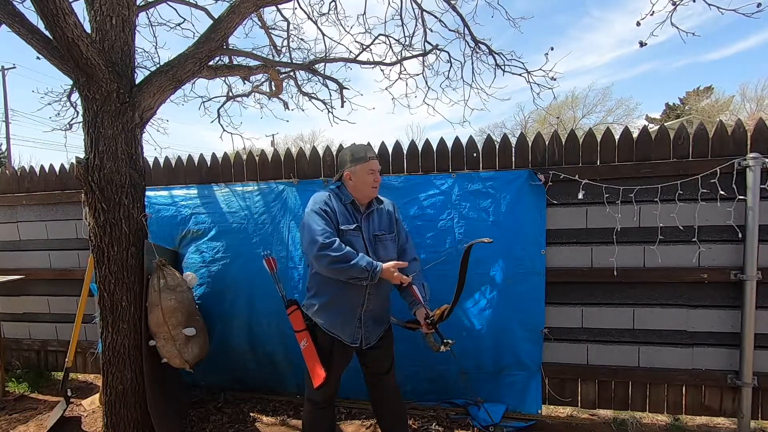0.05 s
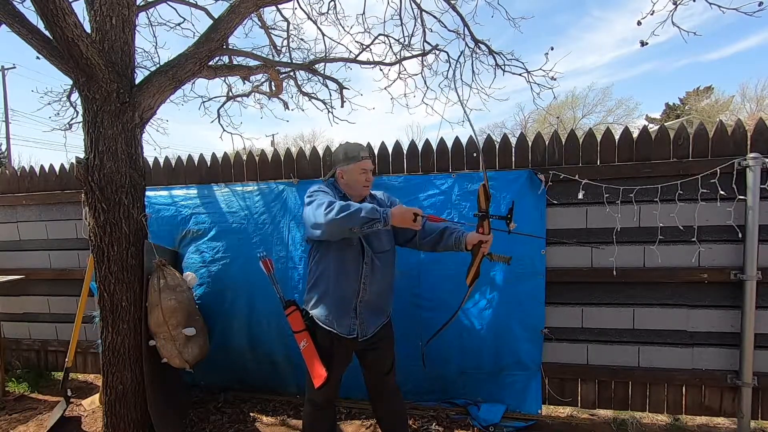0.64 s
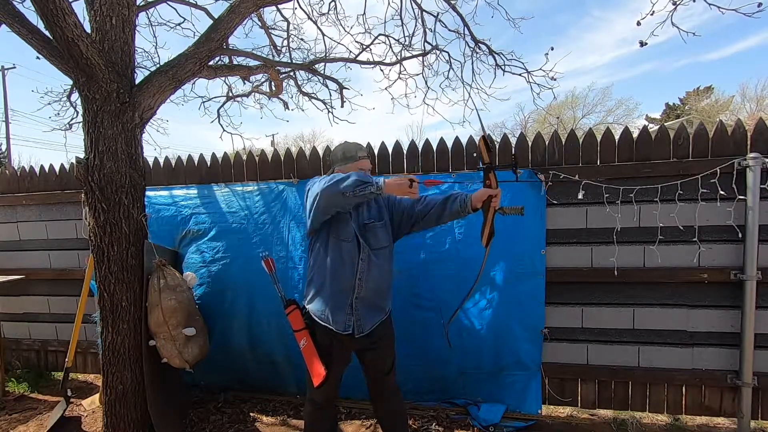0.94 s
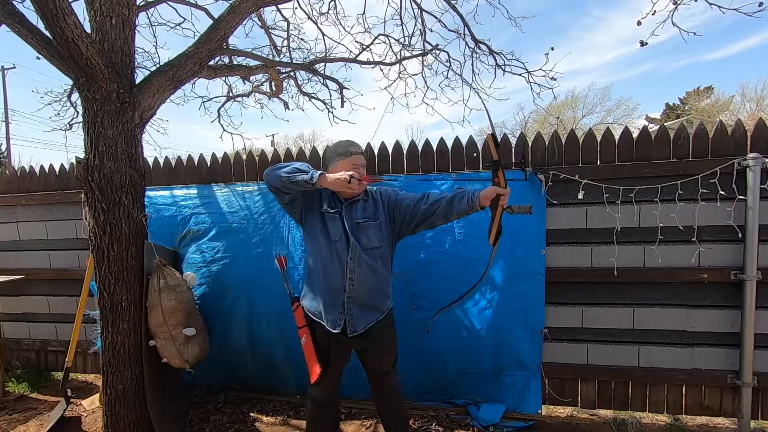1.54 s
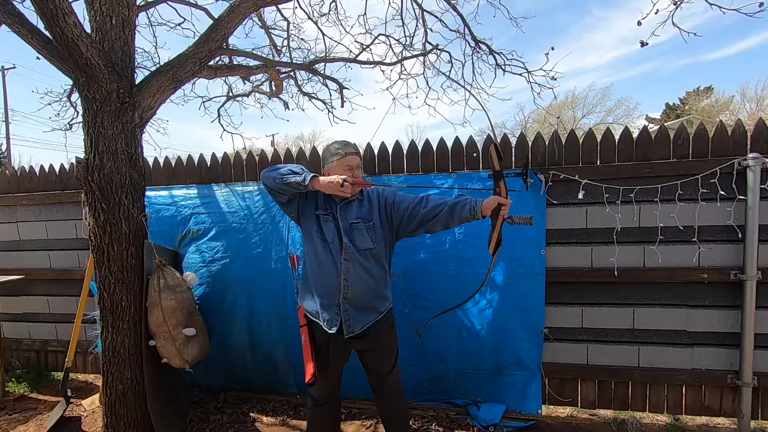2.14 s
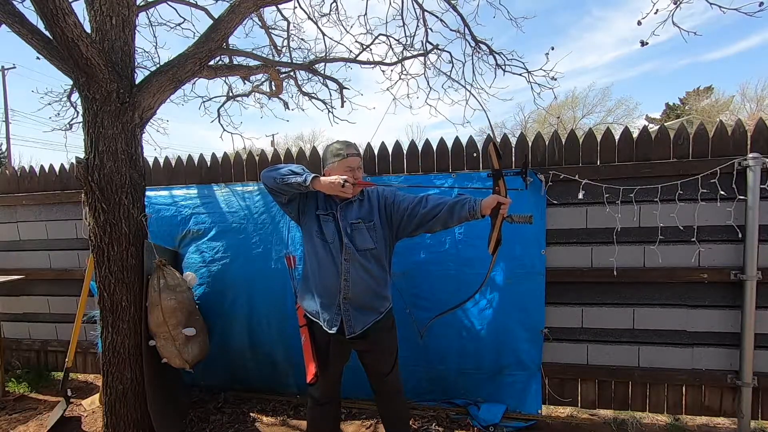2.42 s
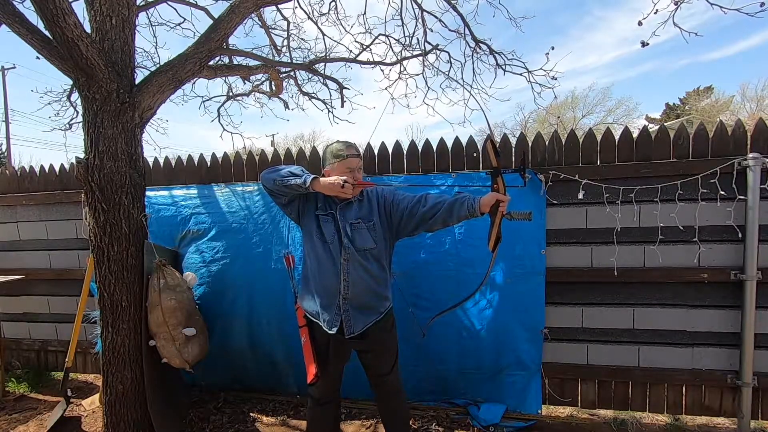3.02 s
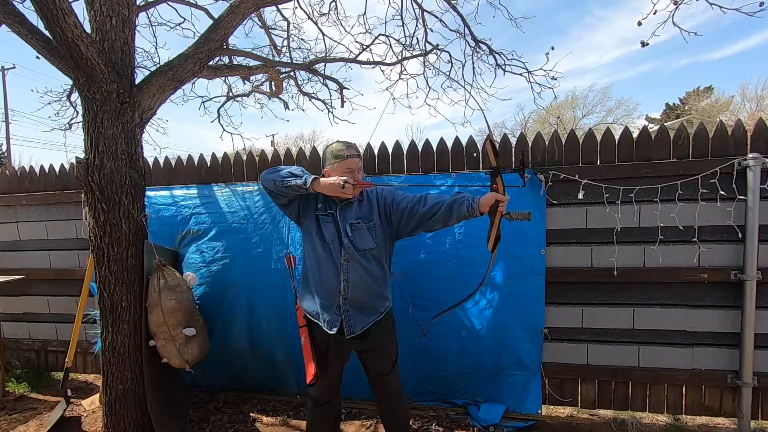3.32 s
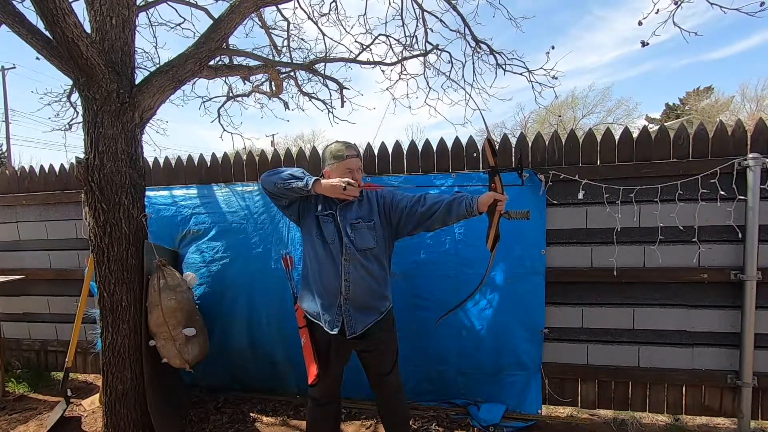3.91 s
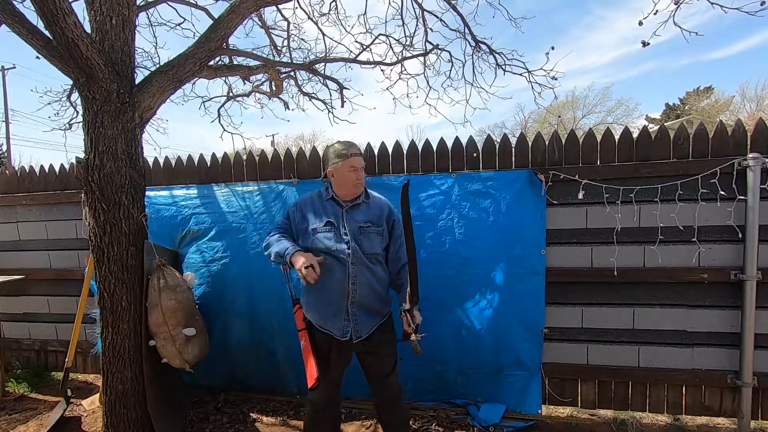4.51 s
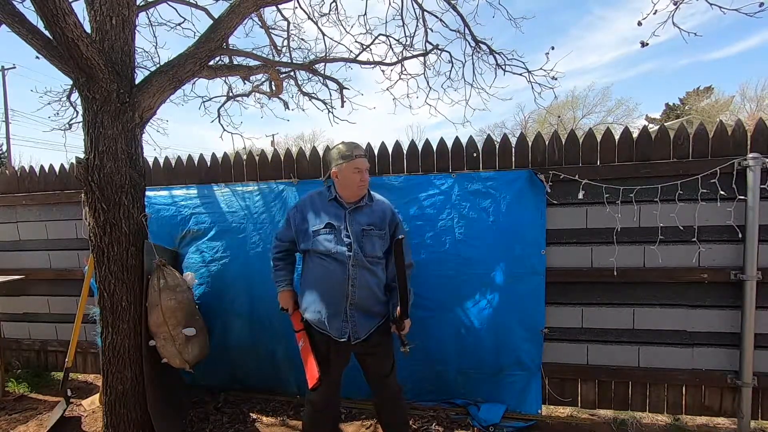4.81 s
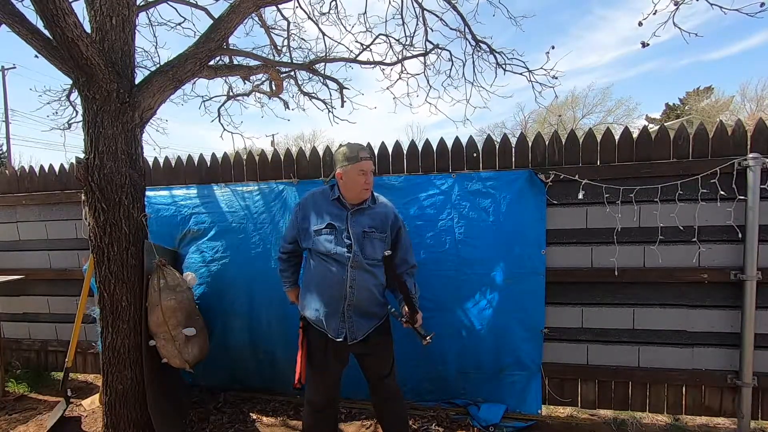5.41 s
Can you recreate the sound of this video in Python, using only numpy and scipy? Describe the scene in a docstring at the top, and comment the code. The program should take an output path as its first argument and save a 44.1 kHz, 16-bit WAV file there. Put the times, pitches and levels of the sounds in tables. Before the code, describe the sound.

A bow snaps and an arrow thuds into a nearby target in a windy backyard, with two faint bird chirps beforehand.

```python
"""A recurve bow fires one arrow in a fenced backyard on a windy day.
The nock clicks off, the string slaps the limbs and hums out, and the arrow thuds into a nearby target.
Gusts buffet the microphone over a bed of far traffic, and a bird chirps twice before the shot.
The gear ticks now and then; as the bow is lowered, a jacket rustles and the string is brushed."""
import sys
import numpy as np
from scipy import signal
from scipy.fft import rfft, irfft
from scipy.io import wavfile
from scipy.ndimage import uniform_filter1d

SR = 44100
rng = np.random.default_rng(int(sys.argv[2]) if len(sys.argv) > 2 else 0)


def inscribe(sig):
    """Save sig as 16-bit PCM at rate SR to the path in sys.argv[1].

    A 1-D sig is mono; a 2-D sig holds one channel per row.
    Samples are clipped to [-1, 1] before scaling.
    """
    pcm = np.round(np.clip(np.atleast_2d(sig).T, -1, 1) * 32767)
    wavfile.write(sys.argv[1], SR, pcm.astype(np.int16))


N = 244755
T = np.arange(N) / SR


def from_db(db):
    """Decibels as a gain."""
    return 10 ** (np.asarray(db) / 20)


def rms_one(x):
    """The same sound at rms 1."""
    return x / np.sqrt(np.mean(x ** 2) + 1e-20)


def low_pass(x, hz, order=2):
    """Butterworth cut of the treble."""
    return signal.sosfilt(signal.butter(order, min(hz, .45 * SR), fs=SR, output="sos"), x)


def high_pass(x, hz, order=2):
    """Butterworth cut of the bass."""
    return signal.sosfilt(signal.butter(order, hz, "high", fs=SR, output="sos"), x)


def noise(colour):
    """Steady noise shaped by an EQ curve of (Hz, dB) points, rms 1."""
    hz, db = np.transpose(colour)
    bins_hz = np.arange(1, N // 2 + 2) * SR / N
    eq = from_db(np.interp(np.log(bins_hz), np.log(hz), db))
    return rms_one(irfft(rfft(rng.standard_normal(N)) * eq, N))


def band_noise(hz, width_hz):
    """Noise through one broad or narrow resonance, rms 1."""
    middle = np.sqrt(hz ** 2 + width_hz ** 2 / 4)
    edges = np.clip([middle - width_hz / 2, middle + width_hz / 2], 10, .45 * SR)
    band = signal.butter(2, edges, "band", fs=SR, output="sos")
    return rms_one(signal.sosfilt(band, rng.standard_normal(N)))


def evened(x, seconds):
    """The sound levelled by its own running rms."""
    return x / np.sqrt(uniform_filter1d(x ** 2, int(seconds * SR)) + 1e-6)


def swells(rows):
    """Envelope of rounded swells (peak s, dB, half length s) that add in power."""
    gains = (from_db(db) / np.cosh(np.clip((T - s) / half, -30, 30)) for s, db, half in rows)
    return np.sqrt(sum(gain ** 2 for gain in gains))


def clicks(events):
    """One impulse for each (s, dB)."""
    out = np.full(N, 1e-18)
    for s, db in events:
        out[round(s * SR)] += from_db(db)
    return out


def ring(force, modes):
    """Struck modes (Hz, dB, t60 s) as decaying sines."""
    out = np.zeros(N)
    for hz, db, t60 in modes:
        decay, angle = from_db(-60 / (t60 * SR)), 2 * np.pi * hz / SR
        feedback = [1, -2 * decay * np.cos(angle), decay * decay]
        out += from_db(db) * signal.lfilter([0, np.sin(angle)], feedback, force)
    return out


def fade(force, t60):
    """Envelope that jumps at each blow and dies away."""
    return signal.lfilter([1], [1, -from_db(-60 / (t60 * SR))], force)


def yard(x, near_db, far_db, near_t60=0.052, far_t60=.5, near_hz=11000, far_hz=4200, delay_s=0.0025):
    """Sound with its quick scatter off fence and ground and a duller tail from trees and houses."""
    t = T[:SR]
    scatter, tail = rng.standard_normal((2, SR))
    near = low_pass(scatter, near_hz) * from_db(-60 * t / near_t60) * (t > delay_s)
    far = low_pass(tail, far_hz, order=4) * from_db(-60 * t / far_t60) * (1 - np.exp(-t / 0.018))
    echo = from_db(near_db) * near / np.linalg.norm(near) + from_db(far_db) * far / np.linalg.norm(far)
    return x + signal.fftconvolve(x, echo)[:N]


# Gusts on the microphone, and the low puff of the arrow's thud at 4.34 s.
# Each row: peak in seconds, rumble in dB, flutter in dB, half length in seconds.
GUSTS_AND_PUFF = [(0.095, -24, -32.5, 0.12), (0.286, -23, -41.5, 0.1), (2.077, -24, -49, 0.064),
                  (2.4, -13.5, -32.5, 0.052), (2.603, -10, -27.5, 0.055), (2.882, -16, -41, 0.071),
                  (3.0, -21, -40, 0.037), (3.18, -21, -46, 0.12), (4.344, -34, -30, 0.037),
                  (4.587, -19.5, -42.5, 0.12), (4.762, -14, -35.5, 0.082), (4.926, -24.5, -21, 0.017),
                  (5.016, -15, -36.5, 0.082), (5.454, -24.5, -37, 0.074)]
# EQ of the wind's sub rumble and its bass flutter. Each row: frequency in Hz, relative level in dB.
RUMBLE_COLOUR = [(5, -5.5), (10, 3.5), (20, 0.5), (32, -5), (45, -21), (70, -30), (120, -48), (300, -72)]
FLUTTER_COLOUR = [(30, -23), (55, 7), (85, 3), (130, -25), (220, -25.5), (600, -59)]
# The fastest gust's roar, then single eddies.
# Each row: centre in seconds, level in dB, half length in seconds.
ROAR = [(2.585, -28.5, 0.027)]
BUFFETS = [(0.108, -21.5, 0.0029), (2.575, -8.5, 0.0081), (2.624, -5.5, 0.015), (4.932, 0.5, 0.0099)]

def wind(lull_rumble_db=-39, lull_flutter_db=-47):
    """Eddies rumble, flutter and buffet on the microphone; one swell is the arrow's low puff."""
    peak_s, rumble_db, flutter_db, half_s = np.transpose(GUSTS_AND_PUFF)
    rumble_gain = np.hypot(from_db(lull_rumble_db), swells(zip(peak_s, rumble_db, half_s)))
    flutter_gain = np.hypot(from_db(lull_flutter_db), swells(zip(peak_s, flutter_db, half_s)))
    rumble = rumble_gain * evened(noise(RUMBLE_COLOUR), seconds=0.067)
    flutter = flutter_gain * evened(noise(FLUTTER_COLOUR), seconds=0.082)
    roar = swells(ROAR) * band_noise(hz=109, width_hz=54)
    buffets = np.zeros(N)
    for s, db, half in BUFFETS:
        offset = (T - s) / half
        # a passing eddy is a brief dip in pressure between two rises
        buffets += from_db(db) * (offset ** 2 - 1) * np.exp(-.5 * offset ** 2)
    return low_pass(rumble + flutter + roar + buffets, hz=450)


# EQ of far traffic and of still air. Each row: frequency in Hz, relative level in dB.
TRAFFIC_COLOUR = [(60, -12.5), (115, -5), (150, -17.5), (200, -10), (280, -13.5), (440, -14), (600, -16.5),
                  (800, -16), (1150, -21), (1700, -28.5), (2600, -37.5), (5000, -45.5), (16000, -84)]
AIR_COLOUR = [(1500, -2.5), (2700, -1), (5000, -1), (8000, -4), (15500, -4.5)]
# Swells of traffic, then a breeze through twigs and fence.
# Each row: peak in seconds, level in dB, half length in seconds.
TRAFFIC_SWELLS = [(0.1, -53, 0.36), (2.2, -50, 0.38), (4.6, -51, 0.69), (5.5, -48.5, 0.14)]
BREEZE = [(2.2, -59.5, 0.27)]
# Far machinery. Each row: centre in Hz, width in Hz, level in dB.
DRONE_BANDS = [(116, 36.6, -45.5), (177.2, 7.1, -53), (446.2, 17, -63.5)]

def town():
    """The ambience bed: far traffic, a wavering machine drone, a faint hiss and a passing breeze."""
    traffic = np.hypot(from_db(-49), swells(TRAFFIC_SWELLS)) * noise(TRAFFIC_COLOUR)
    drone = sum(from_db(db) * band_noise(hz, width) for hz, width, db in DRONE_BANDS)
    hiss = from_db(-64) * noise(AIR_COLOUR)
    breeze = swells(BREEZE) * band_noise(hz=1180, width_hz=820)
    return traffic + drone + hiss + breeze


# Small knocks. Each row: start in seconds, level in dB, centre in Hz, t60 in seconds.
GEAR_TICKS = [(1.111, -59, 4600, 0.045), (1.166, -54.5, 2590, 0.034), (1.211, -51.5, 1990, 0.035),
              (3.479, -42, 556, 0.043), (4.074, -37, 3980, 0.013), (4.491, -43.5, 2660, 0.016),
              (4.581, -59, 5270, .04), (4.746, -50.5, 8500, 0.015), (4.909, -50, 2560, 0.058),
              (5.271, -46, 1720, 0.11), (5.315, -55, 2470, 0.1), (5.427, -44.5, 2760, 0.086),
              (5.479, -51.5, 2800, 0.038)]
# Jacket moves. Each row: peak in seconds, level in dB, half length in seconds.
RUSTLES = [(4.71, -52.5, 0.036), (4.83, -55.5, 0.026), (4.92, -55.5, 0.046), (5.3, -63.5, 0.18)]
# EQ of the cloth. Each row: frequency in Hz, relative level in dB.
CLOTH_COLOUR = [(500, 9), (1500, -1), (5000, -8.5), (9000, -15), (15000, -24)]
# A brush against the string as the bow is lowered. Each row: start in seconds, strength in dB.
STRING_TOUCH = [(5.412, 0.5)]
# The brushed string's ring. Each row: pitch in Hz, relative level in dB, t60 in seconds.
STRING_MODES = [(390, -51, 0.36), (552, -45, 0.97), (974, -53, 0.91), (1370, -60, .6), (4730, -66, 0.36)]

def gear():
    """Handling foley: light knocks of bow and quiver, rustling cloth and a brushed string."""
    knocks = sum(fade(clicks([(s, db)]), t60) * band_noise(hz, 0.99 * hz)
                 for s, db, hz, t60 in GEAR_TICKS)
    creases = from_db(2.4 * rms_one(low_pass(rng.standard_normal(N), hz=59.9)))
    cloth = swells(RUSTLES) * rms_one(creases * noise(CLOTH_COLOUR))
    string = ring(clicks(STRING_TOUCH), STRING_MODES)
    return yard(knocks + cloth, near_db=-7, far_db=-25) + string


# Bird calls. Each row: time the pitch tops out in seconds, level in dB, top pitch in Hz.
CHIRPS = [(1.258, -50.5, 4450), (2.419, -43.5, 4380)]

def bird(rise_hz_per_s=24000, hold_s=0.00404, fall_hz_per_s=72000, range_hz=1700,
         half_s=.017, trill_hz=69, trill_depth=0.61):
    """A rough, trilling whistle climbs, holds and drops, with a weaker lower voice beside it."""
    out = np.zeros(N)
    for s, db, top_hz in CHIRPS:
        t = T - s
        below_top_hz = np.maximum(-rise_hz_per_s * t, fall_hz_per_s * (t - hold_s))
        pitch_hz = top_hz - np.clip(below_top_hz, 0, range_hz)
        waver = 1 + .025 * rms_one(low_pass(rng.standard_normal(N), hz=350))
        phase = 2 * np.pi * np.cumsum(pitch_hz * waver) / SR
        trill = (1 + trill_depth * np.cos(2 * np.pi * trill_hz * t)) / (1 + trill_depth)
        level = from_db(db) * np.exp(-.5 * (t / half_s) ** 2) * trill
        out += level * (np.sin(phase) + from_db(-6.5) * np.sin(.82 * phase))
    return yard(out, near_db=-5.5, far_db=-19)


# EQ of the shaft's scrape. Each row: frequency in Hz, relative level in dB.
SLIDE_COLOUR = [(300, -5), (1200, 4.5), (3000, -3.5), (5500, -0.5), (8000, -12.5), (12000, -13),
                (16000, -25)]

def shaft_slide(peak_s=3.969, hold_s=.022, rise_db_per_s=1700, fall_db_per_s=421):
    """The shaft scrapes over the rest, louder as it gathers speed, then fades."""
    below_peak_db = np.maximum(rise_db_per_s * (peak_s - T), fall_db_per_s * (T - peak_s - hold_s))
    return from_db(-22.5 - np.clip(below_peak_db, 0, 200)) * noise(SLIDE_COLOUR)


# The nock leaving the string. Each row: start in seconds, strength in dB.
NOCK_CLICKS = [(3.9622, -15), (3.9628, -2), (3.9665, -20)]
# The nock's bright tick, then the limbs' knock and the string's hum, both with the fenced yard's low ring.
# Each row: pitch in Hz, relative level in dB, t60 in seconds.
NOCK_MODES = [(1320, -16.5, 0.017), (5300, -15, 0.0059), (5600, -12.5, 0.016), (7070, -7, 0.0039),
              (8470, -18.5, 0.0073), (10900, -34, 0.005)]
LIMB_YARD_MODES = [(188.6, -15.5, 0.4), (311, -28, 0.18), (370.4, -23.5, 0.23), (446, -26, 0.045),
                   (607, -36, 0.055), (794, -17, 0.051), (1073, -25.5, 0.045), (1215, -32, .04),
                   (1396, -16, 0.027), (1670, -16.5, 0.04), (1820, -21, 0.048), (2105, -15.5, 0.054),
                   (2490, -27, .05), (3120, -25, .03), (4320, -24, 0.03)]
HUM_YARD_MODES = [(178, -43, 1.3), (377, -52, .9), (441, -52, .9), (1093, -42, .8), (1190, -56, .65),
                  (1556, -54, .6), (5303, -61, .6)]
# EQ of the string's smack. Each row: frequency in Hz, relative level in dB.
SMACK_COLOUR = [(88, -36), (150, -12), (297, -4), (759, -4.5), (854, -15.5), (1080, -3), (1360, -9.5),
                (1630, 0.5), (2060, -10.5), (2310, -8), (2500, -9.5), (10800, -38), (16000, -41)]

def bow(slap_s=3.9746, slap_db=1.5):
    """The shaft slides, the nock snaps free, and the string slaps home several times and hums out."""
    nock = from_db(-2) * ring(clicks(NOCK_CLICKS), NOCK_MODES)
    slaps = string_slaps(slap_s, slap_db)
    knock = from_db(-7) * ring(slaps, LIMB_YARD_MODES)
    smack = from_db(-15.5) * fade(slaps, t60=0.038) * noise(SMACK_COLOUR)
    hum = ring(clicks([(slap_s, slap_db)]), HUM_YARD_MODES)
    shot = shaft_slide() + nock + knock + smack + fittings()
    return yard(shot, near_db=-15, far_db=-29, near_t60=0.32, far_t60=0.91, near_hz=14000) + hum


def string_slaps(start_s, strength_db, count=5, gap_s=.012, stretch=1.12, loss_db=1.4):
    """Impulses of the string hitting one limb, then the other, each rebound slower and weaker."""
    rebound = np.arange(count)
    gaps = gap_s * stretch ** rebound
    times = start_s + np.cumsum(gaps) - gaps
    first_limb = np.column_stack([times, strength_db - loss_db * rebound ** 2])
    second_limb = first_limb + [0.002736, -3]   # seconds later, dB softer
    return clicks(np.vstack([first_limb, second_limb]))


# Buzz of the fittings. Each row: centre in Hz, width in Hz, relative level in dB, t60 in seconds.
BUZZ_BANDS = [(5300, 540, -47, 0.079), (6350, 700, -49, .04)]

def fittings(start_s=4.07, gap_s=.0257, first_db=-2, loss_db=1.7, count=10):
    """Loose fittings rattle evenly, dying away as the bow shakes out."""
    hits = clicks([(start_s + k * gap_s, first_db - k * loss_db) for k in range(count)])
    return sum(from_db(db) * fade(hits, t60) * band_noise(hz, width) for hz, width, db, t60 in BUZZ_BANDS)


# The point piercing the target's layers. Each row: start in seconds, strength in dB.
ARROW_HITS = [(4.3216, 1.5), (4.3226, -9.5), (4.3272, -21)]
# Ring of target and shaft, with the fenced yard's low ring.
# Each row: pitch in Hz, relative level in dB, t60 in seconds.
TARGET_YARD_MODES = [(231.6, -19.5, 0.15), (380, -32, 0.39), (442, -17, 0.24), (592, -3, 0.029),
                     (839, -8.5, 0.033), (1057, -26, 0.04), (1770, -20, 0.04), (1960, -7, 0.016),
                     (2580, -16.5, 0.022), (3136, -11.5, 0.016), (4070, -20, 0.012), (4510, -17, 0.017),
                     (4540, -12.5, 0.017), (5100, -28, .01)]
# EQ of the packing's crunch. Each row: frequency in Hz, relative level in dB.
CRUNCH_COLOUR = [(40, -14), (110, -15), (155, -8), (220, 4.5), (420, 2.5), (850, 1.5), (1400, -3.5),
                 (2000, -3), (2400, -9.5), (3700, -1.5), (4500, -10), (5000, -21), (6500, -28.5),
                 (11500, -31), (16000, -53)]

def arrow():
    """The point cracks through the face, the target booms and its packing crunches round the shaft."""
    blow = clicks(ARROW_HITS)
    body = from_db(-2.5) * ring(blow, TARGET_YARD_MODES)
    splinter = evened(band_noise(hz=3200, width_hz=2200), seconds=.002)
    crack = from_db(-6) * fade(blow, t60=0.0046) * splinter
    snap = from_db(-27) * fade(blow, t60=0.0029) * band_noise(hz=9500, width_hz=3600)
    crunch = from_db(-16) * fade(blow, t60=0.12) * noise(CRUNCH_COLOUR)
    impact = high_pass(body + crunch, hz=171, order=4) + crack + snap
    return yard(impact, near_db=-16, far_db=-30, near_t60=0.19, far_t60=0.45, near_hz=8900, far_hz=4230)


def scene():
    """Mono mix of the shot, the gear, the bird, the wind and the town."""
    return (bow() + arrow() + gear() + bird() + wind() + town())[None]


def record(dry):
    """The loudest peaks clip, the microphone rolls off the treble and the very top is cut steeply."""
    rolled = low_pass(np.clip(dry, -1, 1), hz=13600)
    top_cut = signal.ellip(12, .1, 80, 15800, fs=SR, output="sos")
    return signal.sosfilt(top_cut, rolled)


dry = scene()
out = record(dry)
inscribe(out)
```